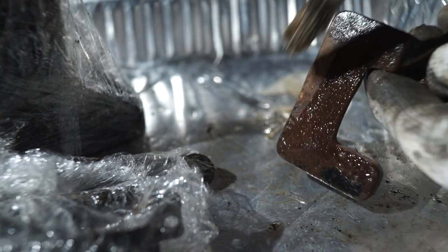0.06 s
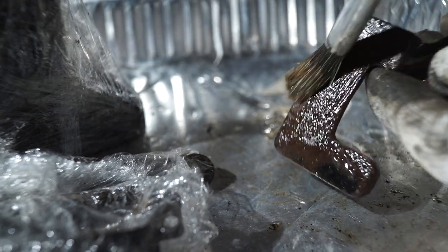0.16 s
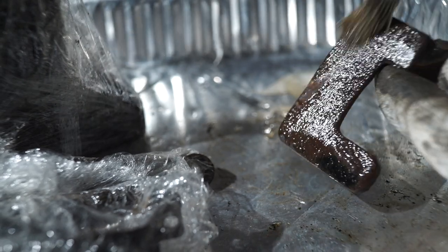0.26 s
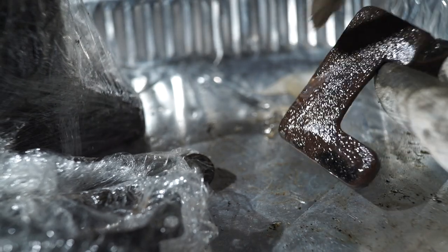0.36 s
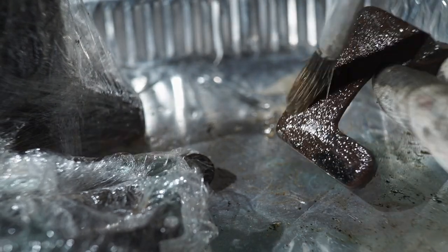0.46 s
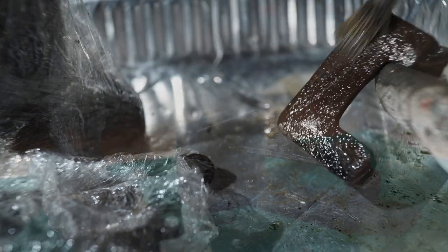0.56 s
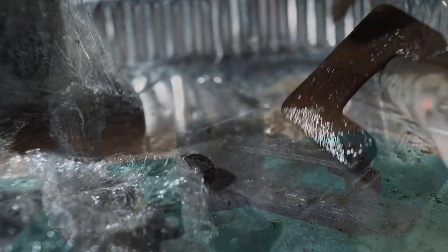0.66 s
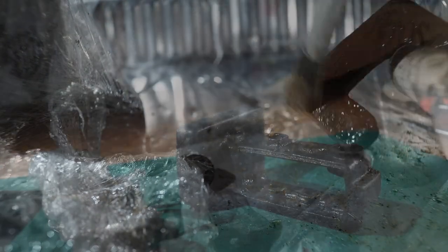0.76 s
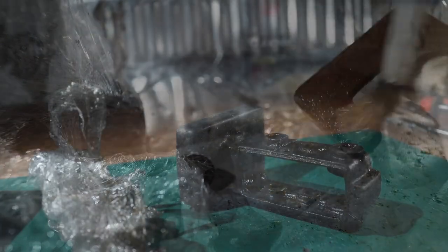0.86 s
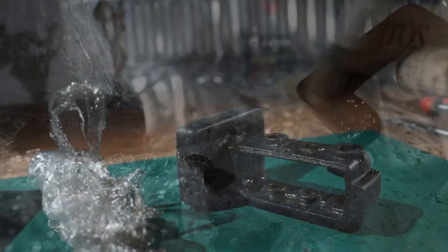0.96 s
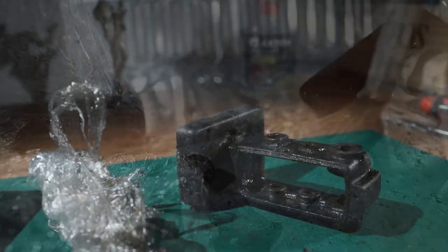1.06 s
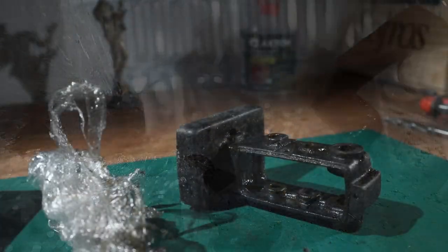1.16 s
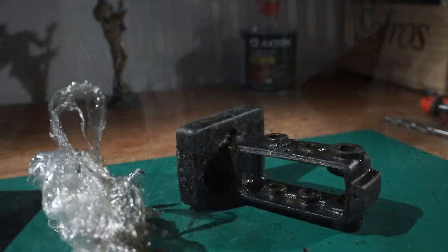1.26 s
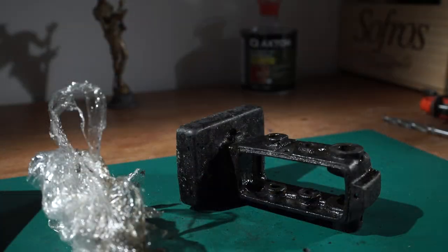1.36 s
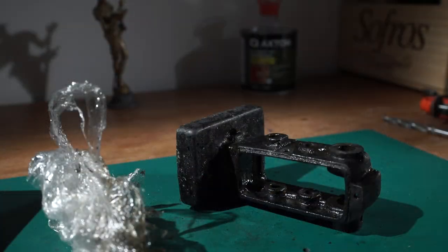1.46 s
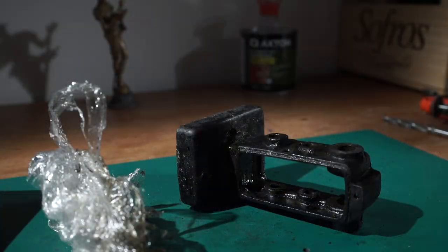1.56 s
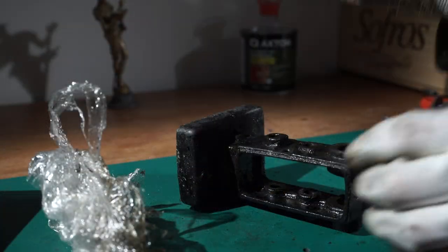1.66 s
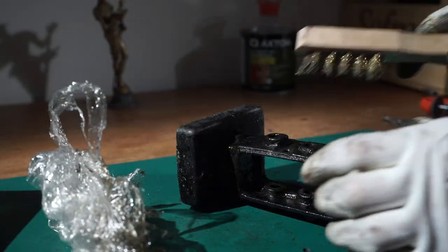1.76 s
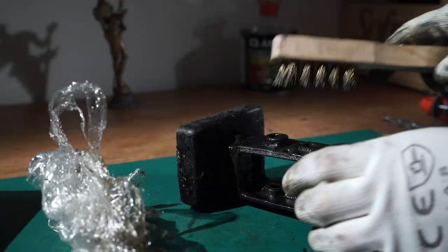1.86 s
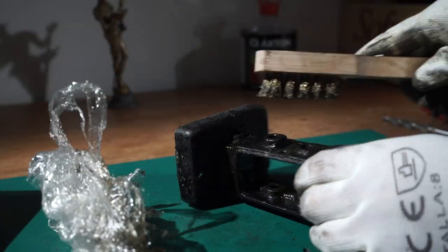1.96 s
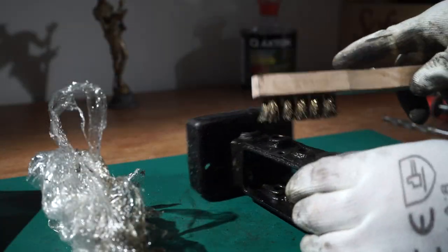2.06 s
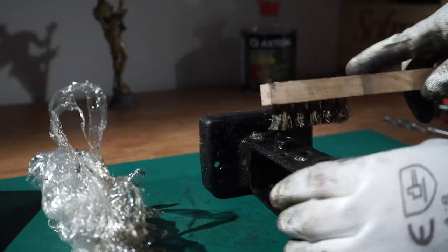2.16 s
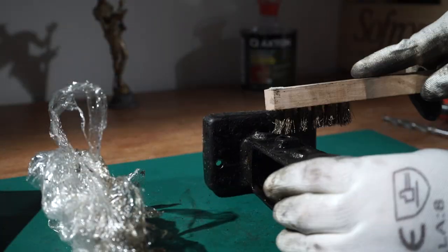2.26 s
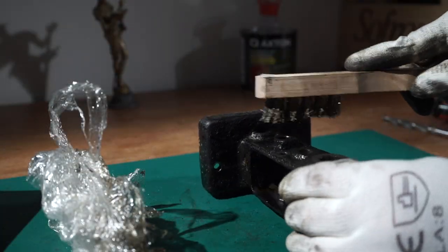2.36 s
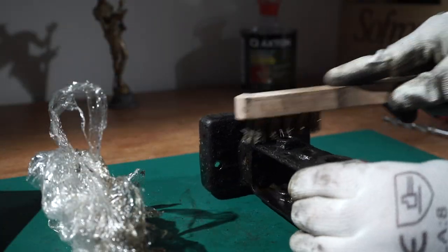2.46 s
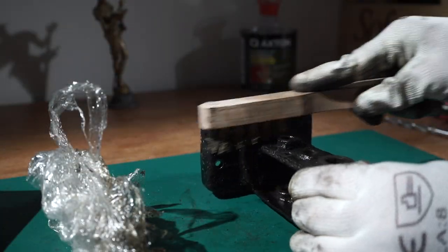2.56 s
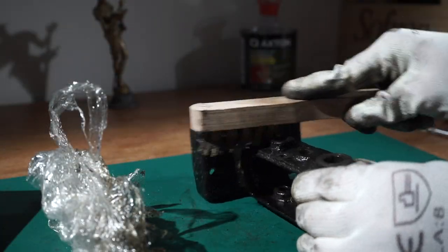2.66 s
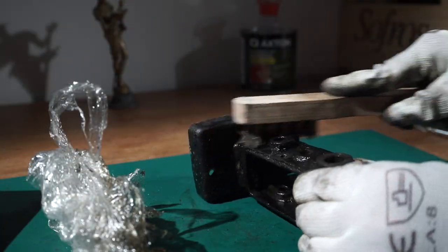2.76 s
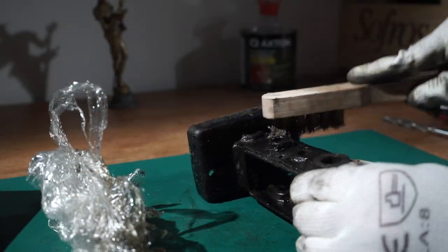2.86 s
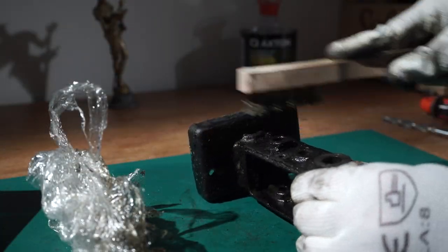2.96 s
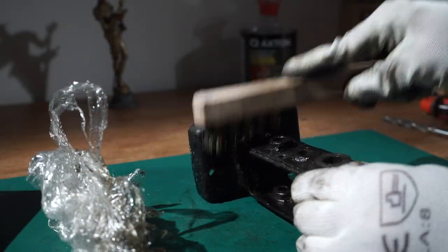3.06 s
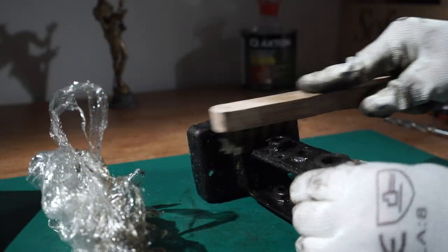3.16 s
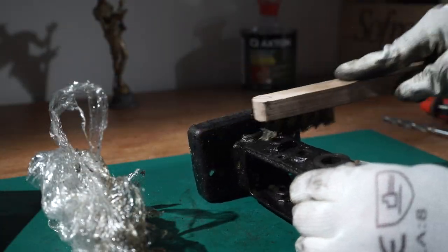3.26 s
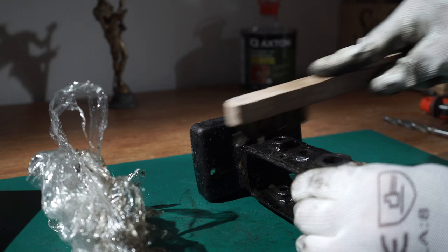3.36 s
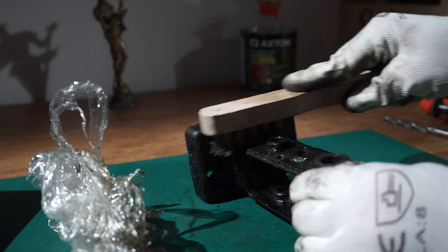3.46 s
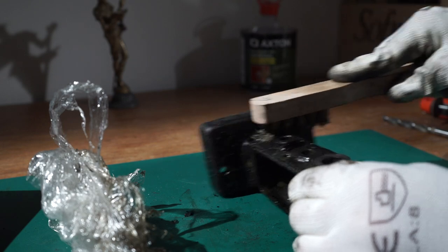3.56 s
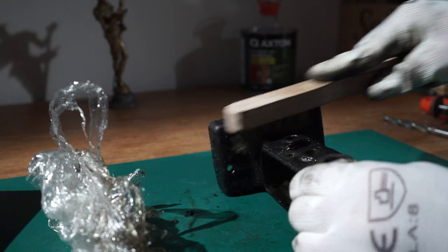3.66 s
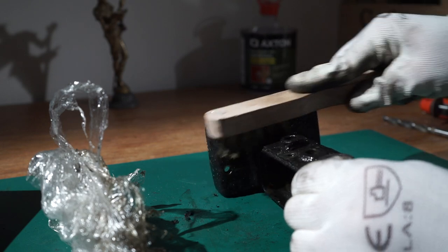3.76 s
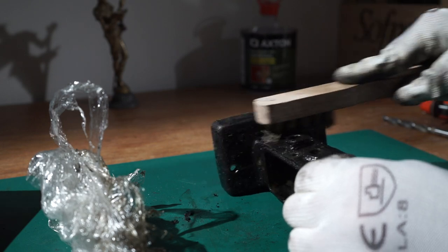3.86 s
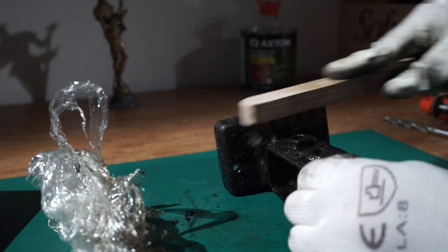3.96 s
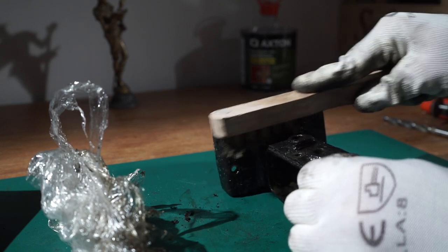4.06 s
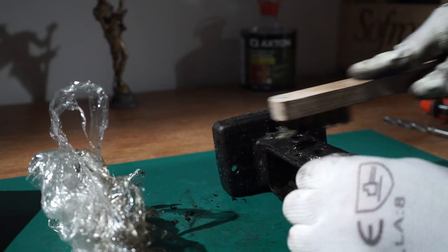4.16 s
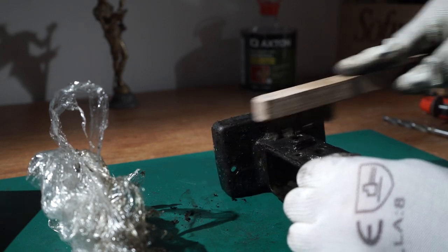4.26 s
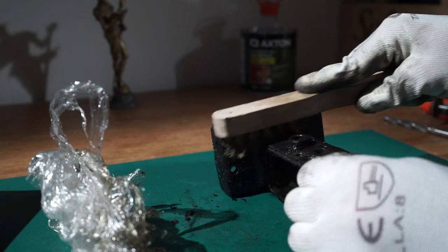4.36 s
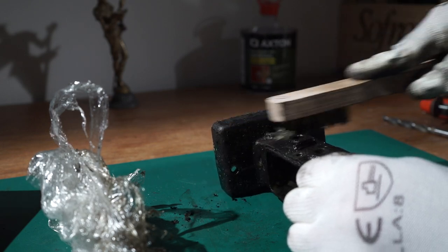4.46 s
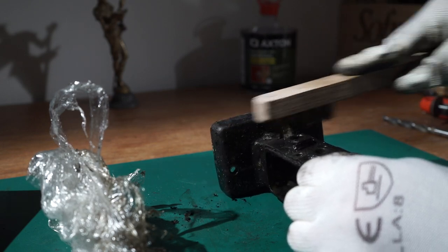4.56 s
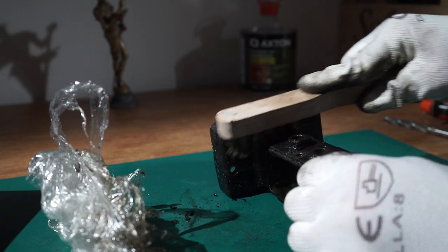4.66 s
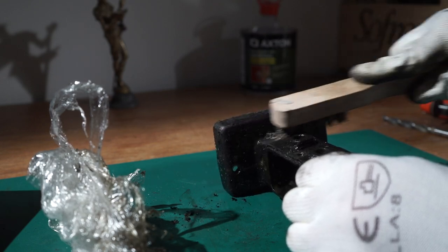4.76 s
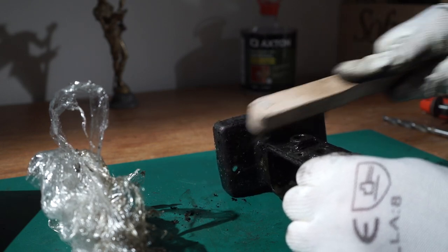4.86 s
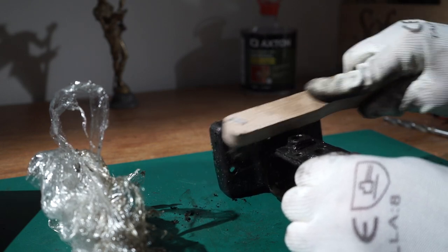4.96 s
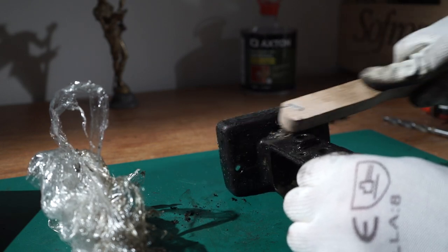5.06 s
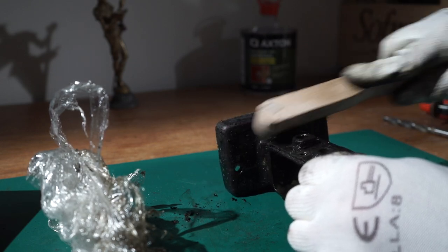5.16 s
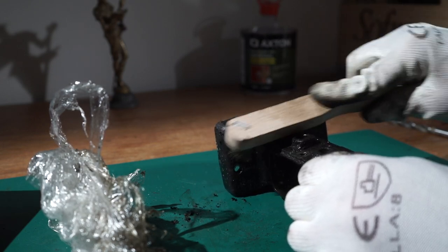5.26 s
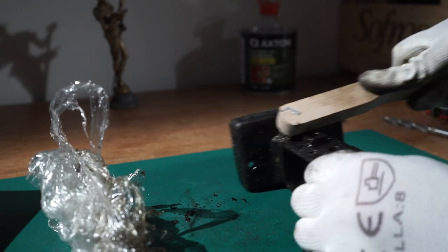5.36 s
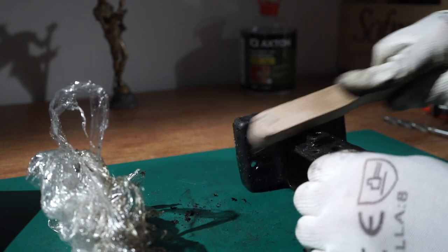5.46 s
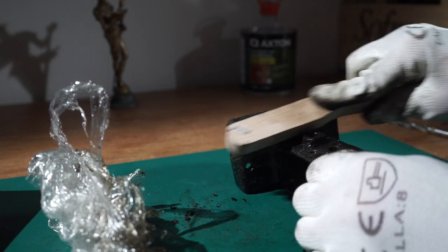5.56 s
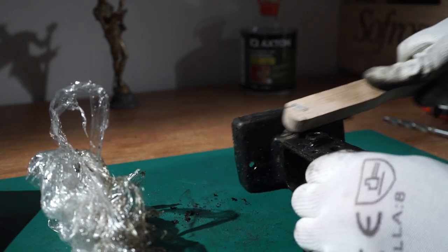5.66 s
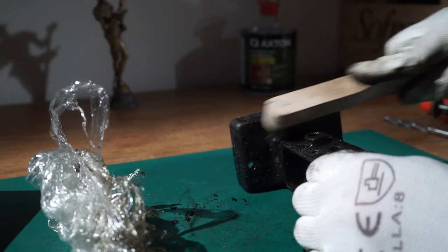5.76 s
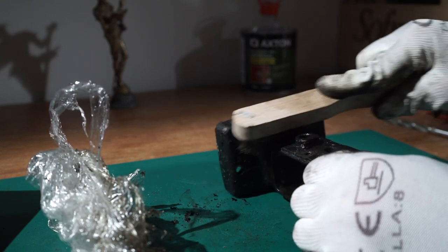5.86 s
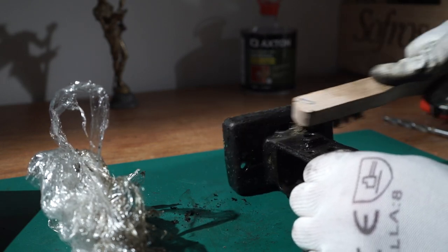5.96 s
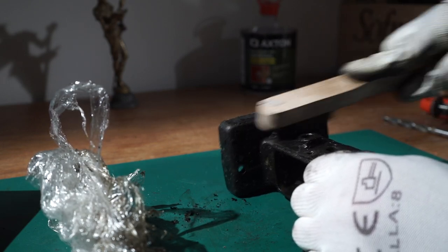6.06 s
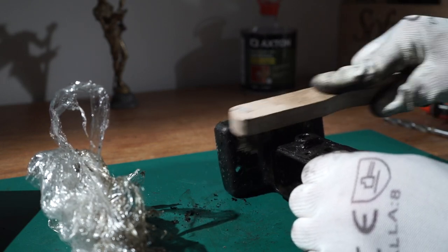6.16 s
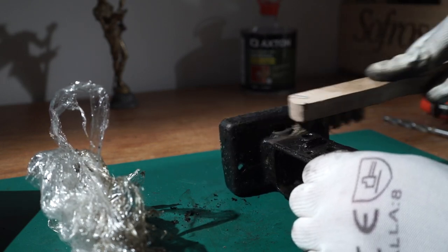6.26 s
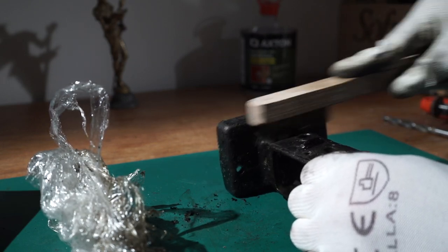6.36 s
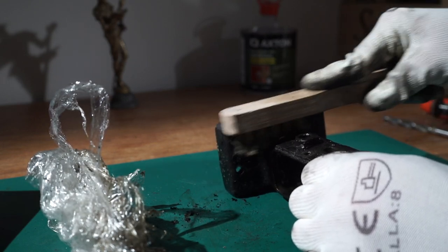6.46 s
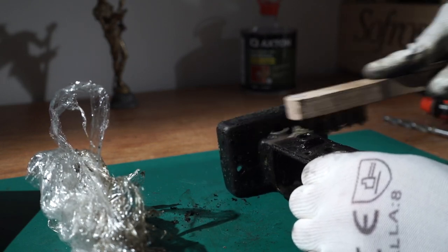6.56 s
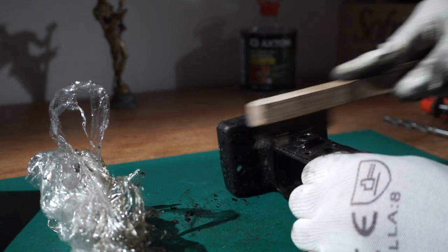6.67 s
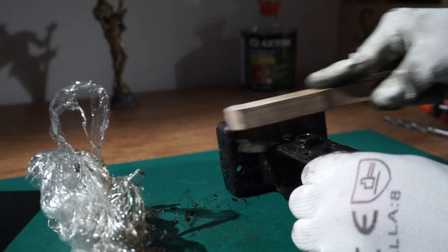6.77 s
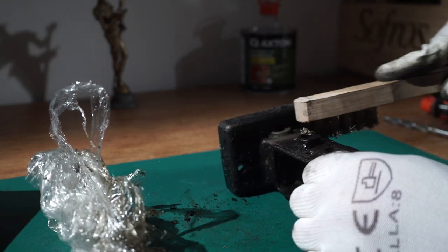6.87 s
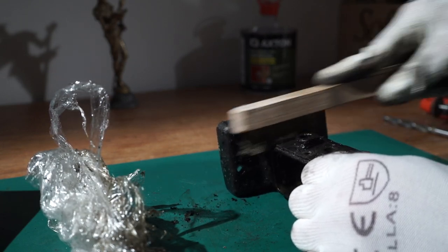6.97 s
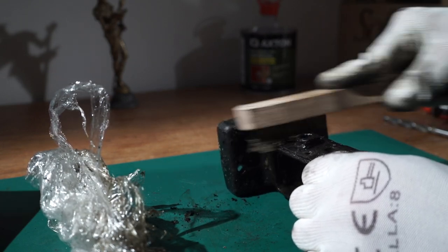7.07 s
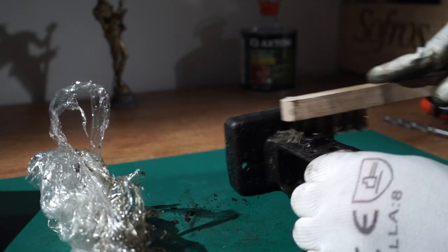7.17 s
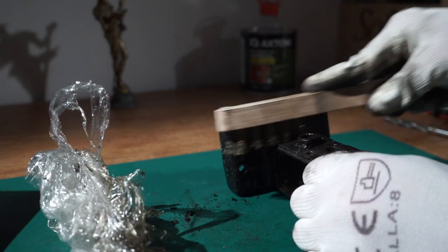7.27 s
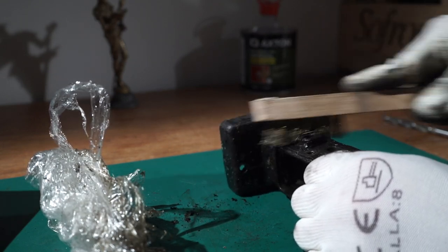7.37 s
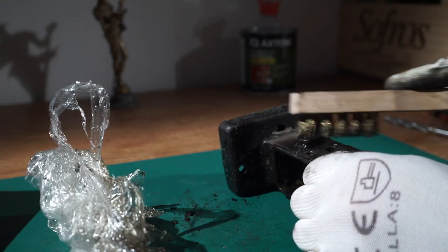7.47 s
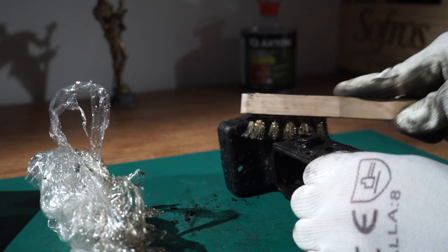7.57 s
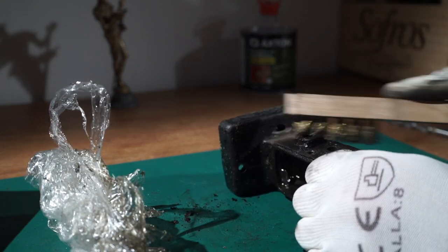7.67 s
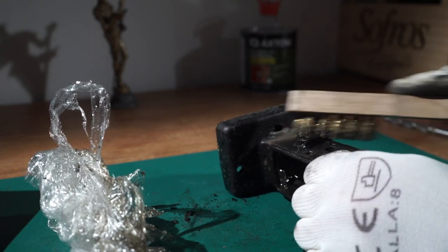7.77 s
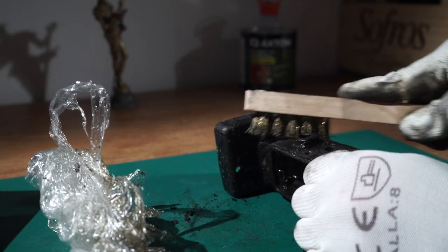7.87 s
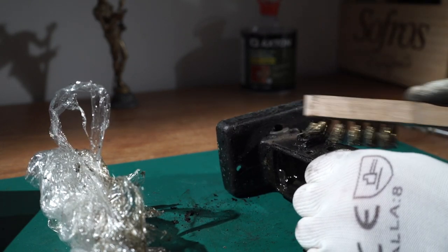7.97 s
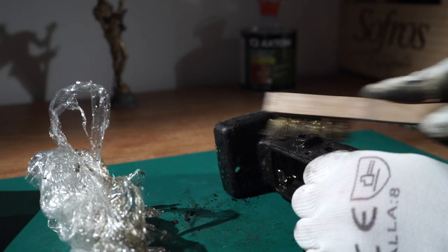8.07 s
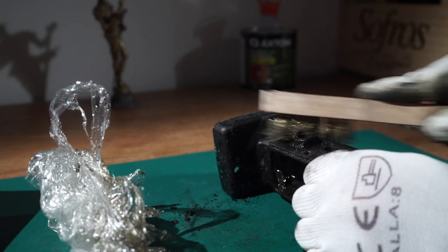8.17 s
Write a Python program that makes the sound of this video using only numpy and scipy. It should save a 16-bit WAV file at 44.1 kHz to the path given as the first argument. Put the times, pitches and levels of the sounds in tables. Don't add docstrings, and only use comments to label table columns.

```python
import sys
import numpy as np
from scipy import signal
from scipy.fft import rfft, irfft, next_fast_len
from scipy.io import wavfile
from scipy.ndimage import uniform_filter1d

SR = 44100
rng = np.random.default_rng(int(sys.argv[2]) if len(sys.argv) > 2 else 0)


def generate_wav(sig):
    pcm = np.round(np.clip(np.atleast_2d(sig).T, -1, 1) * 32767).astype(np.int16)
    wavfile.write(sys.argv[1], SR, pcm)


def volts_from_decibels(level):
    exponent = np.asarray(level, float) / 20
    return 10 ** exponent


N = 362502
TIME_S = np.arange(N) / SR

SPOT_CHANGES_S = 3.38, 7.35


def spot_at(s):
    return np.searchsorted(SPOT_CHANGES_S, s)


# [start_s, length_s, hiss_db, tuft_hump_rel_db, table_shake_db]
TRIALS = [
    (2.49, 0.31, -64.5, -8, -37),
    (2.724, 0.2, -48.5, 8.5, -32.5),
    (3.135, 0.01, -49, 10, -60),
    (3.19, 0.15, -48.5, 9, -33.5),
]
PUSHES = [(3.392, 0.1, -47.5, 14.5, -30), (3.684, 0.11, -45, 13.5, -24), (4.005, 0.099, -45, 11.5, -25),
          (4.306, 0.097, -42.5, 14.5, -24.5), (4.608, 0.087, -42, 18.5, -19),
          (4.899, 0.098, -42.5, 15.5, -21.5), (5.205, 0.092, -41.5, 15, -25),
          (5.487, 0.1, -42, 13.5, -21.5), (5.802, 0.09, -42.5, 14, -24.5), (6.094, 0.1, -41.5, 16, -27),
          (6.388, 0.099, -42.5, 15, -26), (6.691, 0.095, -43, 10.5, -23.5), (6.973, 0.095, -41, 9.5, -17),
          (7.258, 0.084, -43, 6.5, -17.5), (7.541, 0.09, -46, 6, -26.5), (7.823, 0.089, -46, 4, -26),
          (8.081, 0.085, -43.5, 2, -24.5)]
PULLS = [(3.529, 0.11, -49, 12, -21.5), (3.817, 0.14, -48.5, 11.7, -26.5), (4.125, 0.13, -45.5, 12.4, -27),
         (4.443, 0.11, -45, 9.5, -28), (4.733, 0.13, -45.5, 9.6, -24.5), (5.026, 0.13, -45, 14.5, -23.5),
         (5.322, 0.12, -45, 16.3, -26), (5.624, 0.13, -44, 15.8, -26.5), (5.923, 0.13, -44.5, 11.6, -28.5),
         (6.229, 0.12, -46, 13.4, -27), (6.518, 0.12, -46.5, 10.2, -28.5), (6.817, 0.11, -44.5, 9.4, -27.5),
         (7.096, 0.11, -45, 9.6, -29), (7.375, 0.12, -44, 4.2, -26.5), (7.664, 0.13, -44.5, 4, -29.5),
         (7.95, 0.098, -45.5, 3.6, -30.5), (8.19, 0.42, -46, 15, -26)]
# [push_db, pull_db]
RING_DB = [(0, -12), (-7.5, -5.5), (1, 3)]
TRIAL_RING_DB = [3.5, 2, -3.5, -1]
# start_s, length_s, shake_db
DRAG = (2.034, 0.18, -38.5)


def stroke_pressure():
    kind = np.repeat([0, 1, 2], [len(TRIALS), len(PUSHES), len(PULLS)])
    rows = np.array(TRIALS + PUSHES + PULLS)
    order = np.argsort(rows[:, 0])
    kind = kind[order]
    s, length, db, tuft_db, shake_db = rows[order].T
    peak = np.array([0.3, 0.51, 0.41])[kind]
    frame_db = np.array(RING_DB)[spot_at(s), kind // 2]
    frame_db += 4.5 * (s - 7.8) * (s > SPOT_CHANGES_S[1])
    frame_db[kind == 0] = TRIAL_RING_DB
    pressure = swells(s, length, db, peak, ends_db=9.5)
    pressure += volts_from_decibels(-50) * uniform_filter1d(pressure, 6000)
    force = swells(s, length, shake_db, peak, ends_db=4.5) + swells(*DRAG, 0.38, ends_db=4.5)
    force += volts_from_decibels(-24.5) * uniform_filter1d(force, 6000)
    tuft, frame = (volts_from_decibels(np.interp(TIME_S, s + length / 2, db)) for db in (tuft_db, frame_db))
    return pressure, force, tuft, frame


# [freq_hz, level_db_per_hz]
WIRE_HISS = [(300, -11), (1000, 7.5), (2500, 6.5), (5000, 0.5), (6300, -1), (7800, -2.5), (9000, 3),
             (10200, -3.5), (11800, -1.5), (14000, -7), (15800, -5.5)]
# [freq_hz, width_hz, level_db]
TUFT_MODES = [(2270, 670, -11), (3700, 800, 4.5), (4180, 1220, -3.5)]
# [freq_hz, width_hz, level_db]
FRAME_EDGE = [(1300, 15, -8), (1860, 230, -8), (3220, 60, -12), (3680, 42, -7), (4610, 28, -17),
              (5190, 47, -12), (5390, 42, -5.5), (6200, 33, -23), (7140, 53, -19), (9000, 120, -22),
              (10800, 44, -29), (11500, 110, -27)]
FRAME_TOP = [(1290, 40, -12), (2245, 14, -2), (3537, 60, -1), (3680, 48, 1), (5140, 46, -9), (5830, 26, -8),
             (6770, 46, -15), (7040, 70, -14), (7184, 34, -12), (9400, 36, -11), (11780, 60, -16),
             (12360, 61, -14), (13010, 48, -16)]
FRAME_SIDE = [(1280, 79, -18), (1923, 37, -5.5), (2260, 22, -11.5), (2590, 47, -11.5), (3160, 110, -7),
              (3680, 40, -.5), (4620, 40, -15), (5140, 55, -4), (5375, 65, -6), (7080, 110, -10.5),
              (8570, 51, -30), (9500, 57, -21), (11040, 62, -19), (11800, 60, -15)]
# [time_s, level_db]
SIDE_IN = [(6.3, -40), (6.55, -8), (7.2, -6), (7.4, 0), (8.22, 0)]


def wire_brush(pressure, tuft, frame, snaps):
    slips = flicks(per_s=9000, spread_db=-0.56)
    slips = slips * flutter(rate_hz=36.0, depth_db=1.0) * flutter(rate_hz=270, depth_db=-0.36)
    hiss = mottled(colour(slips, WIRE_HISS), depth_db=1.8)
    hiss /= np.std(band(hiss, 6000, 15000))
    tufts = evened(mottled(ring(slips, TUFT_MODES), depth_db=2.0)) * tuft * volts_from_decibels(-3.5)
    drive = volts_from_decibels(28.0) * slips * pressure * frame
    spot = spot_at(TIME_S)
    drive += volts_from_decibels(8) * snaps * (spot == 0) * (TIME_S > 2.4)
    edge = ring_unevenly(drive * (spot == 0), FRAME_EDGE)
    top = ring_unevenly(drive * (spot == 1), FRAME_TOP)
    side = ring_unevenly(drive * follow(SIDE_IN) * (spot > 0), FRAME_SIDE)
    return (hiss + tufts) * pressure + mottled(edge + top + side, depth_db=1.7)


# [start_s, peak_db]
SNAGS = [(3.4186, -21), (3.5633, -20), (3.5937, -20), (3.703, -27), (3.7369, -20), (3.8462, -31),
         (3.8656, -22), (3.8926, -18), (4.0352, -22), (4.1455, -20), (4.2936, -32), (4.4772, -23),
         (4.597, -33), (4.8953, -18), (4.9077, -15), (4.9177, -15), (4.9487, -12), (5.0499, -24),
         (5.2135, -18.5), (5.2334, -23), (5.2424, -39), (5.2619, -19), (5.2884, -29), (5.3502, -19),
         (5.3654, -14), (5.3814, -22), (5.5009, -18), (5.6261, -32), (5.6516, -14), (5.7977, -30),
         (5.8237, -13), (5.9524, -27), (5.9673, -19), (6.1055, -18), (6.131, -14), (6.2577, -30),
         (6.4183, -11.5), (6.54, -26), (6.7256, -23), (6.8448, -29), (6.9614, -37), (6.9795, -19),
         (7.5438, -24), (7.6999, -30), (7.8476, -21), (8.0945, -24)]


def snags():
    return volts_from_decibels(-7) * bursts(SNAGS, 0.012, TUFT_MODES)


# [start_s, peak_db]
PLUCKS = [(2.4998, -57), (2.5138, -51), (2.5437, -38), (2.585, -42), (2.6126, -39), (2.6594, -41),
          (2.6889, -53), (2.7073, -54), (2.7208, -51), (2.7388, -41), (2.7887, -41), (2.876, -30),
          (2.9243, -38)]
# [freq_hz, width_hz, level_db]
TINES = [(3900, 120, 1.5), (6970, 120, -1), (8450, 200, -4), (11900, 280, -7)]


def plucks():
    return volts_from_decibels(0.5) * bursts(PLUCKS, 0.0052, TINES)


# [start_s, length_s, level_db]
LANDINGS = [
    (2.532, 0.11, -58),
    (3.115, 0.034, -59),
]


def landing():
    pings = sum(ring(flicks(per_s=130, spread_db=1.5), [tine]) for tine in TINES)
    return evened(pings) * swells(*np.transpose(LANDINGS), 0.42, ends_db=10)


# [freq_hz, width_hz, level_db]
TABLE_LOW = [(50.4, 44.5, -5.5), (75.4, 18, 5), (108.4, 13.5, 1), (157, 44, -4), (194.5, 65, -9)]
TABLE_HIGH = [(222, 53, 1.5), (303, 39, 4.5), (331.4, 23, 5.5), (423.6, 86, -0.5), (583, 102, -5),
              (687, 150, -9.5)]
SHAKE_HIGH_DB = [-17, -16, -12.5]


def table_shake(force):
    judder = flicks(per_s=800, spread_db=1.03) * flutter(rate_hz=28, depth_db=2.5)
    s, db, high_db, _ = np.transpose(THUMPS + KNOCKS)
    rebound = swells(s, 0.093, db + high_db / 2 - 20.5, 0.1, ends_db=13.5)
    low = evened(ring(band(judder, 32.0, 520), TABLE_LOW)) * force
    high_force = force * volts_from_decibels(np.array(SHAKE_HIGH_DB)[spot_at(TIME_S)]) + rebound
    high = evened(ring(band(judder, 200, 1150), TABLE_HIGH)) * high_force
    return low + high


# [start_s, peak_db, high_modes_rel_db, clack_rel_db]
THUMPS = [
    (0.719, -25.5, -28, 14),
    (0.852, -35, -16, 5),
    (0.988, -36.5, -7, -31),
    (1.399, -39.5, -28, -11),
    (2.045, -18, -20, -19),
    (2.354, -7.5, -18, -30),
    (2.534, -16.5, -61, -37),
    (3.139, 0, -46, -38),
]
KNOCKS = [(3.443, -2.5, -10.5, -18), (3.575, -8.5, -18, -20), (3.882, -24, -5, -33), (4.038, -17, -15, -25),
          (4.312, -22.5, -12.5, -37), (4.346, -19, -5, -20), (4.611, -6, -9.5, -15), (4.761, -19, -11, -28),
          (4.918, -25, -26, -32), (4.993, -8.5, -17, -29), (5.044, -22, -31, -29), (5.112, -12, -6.5, -14),
          (5.423, -9, -11.5, -16), (5.731, -4, -27.5, -26), (6.132, 0, -15, -21), (6.43, -4.5, -14, -36),
          (6.713, -16, -23, -27), (6.96, -12, -9.5, -19), (7.03, -14.5, -18, -2.5), (7.247, 0, -14, -20),
          (7.306, -14, 0, -4), (7.547, -21, -41, -14), (7.807, -4, -10.5, -20.5), (7.865, -10, -9.5, -21.5),
          (8.077, -6, -10.5, -39), (8.125, -7, -5, -32)]
# [start_s, peak_db, high_modes_rel_db]
BUMPS = [(2.79, -30, -28), (2.883, -23, -24), (3.311, -22, -21.5), (3.699, -20, -24), (4.068, -14, -14),
         (4.378, -30, -14), (4.487, -37, -4), (4.669, -15, -21), (4.948, -19, -16), (5.269, -9.5, -29),
         (5.565, -13.5, -14), (5.916, -16, -27), (6.263, -22, -27), (6.398, -20, -25), (6.613, -17, -17),
         (6.733, -19.5, -10), (7.4, -33, -12), (7.696, -15, -18), (7.964, -30, -13)]
# [freq_hz, width_hz, level_db]
THUMP_TABLE = [(51.4, 28, -7), (76.7, 26, 0), (109.6, 7.1, 9), (154, 31, -12), (258, 12, -8.5)]


def knocks():
    out, t = np.zeros(N + SR), np.arange(SR // 3) / SR
    rows = [(*r, 0.19, 0.83) for r in THUMPS]
    rows += [(*r, 0.23, 0.994) for r in KNOCKS]
    rows += [(*r, -60, 0.16, 0.87) for r in BUMPS]
    chance = rng.standard_normal((len(rows), 2, len(t)))
    for (s, db, high_db, clack_db, t60, hard), (tune, grit) in zip(rows, chance):
        modes = THUMP_TABLE if s < SPOT_CHANGES_S[0] else TABLE_LOW
        decay = volts_from_decibels(-60 * t / max(t60, .02))
        glide_hz = hard * (88 + 100 * np.exp(-t / 0.005))
        swing = -np.sin(2 * np.pi * np.cumsum(glide_hz) / SR)
        swing *= (t / .006) ** 1.5 * np.exp(-t / 0.0039)
        after = np.zeros(len(t))
        for k, (hz, _, mode_db) in enumerate(modes):
            cycles = hz * (1 + 0.05 * tune[k]) * t
            after += volts_from_decibels(mode_db) * np.sin(2 * np.pi * (cycles + tune[-k]))
        after *= decay * (1 - np.exp(-(t / 0.03) ** 2))
        rattle = ring(tune * decay * (t > .008), modes)
        pulse = volts_from_decibels(22) * np.exp(-((t - .004) / 0.00033) ** 2)
        high = ring(grit * volts_from_decibels(-60 * t / 0.1) + pulse, TABLE_HIGH)
        clack = band(grit * (t > .002), 390, 1870) * volts_from_decibels(-60 * t / 0.019)
        parts = [(swing, 0), (after, -12), (rattle, -12), (high, high_db + 3.5), (clack, clack_db)]
        out[round(s * SR):][:len(t)] += sum(volts_from_decibels(db + rel_db) * p / abs(p).max() for p, rel_db in parts)
    return band(out[:N], 38, 12000)


# [freq_hz, width_hz, level_db]
BOARD = [(284, 16, -7), (260, 22, -13)]
BOARD_DB = [-18.5, -16.5, -8]
# [start_s, length_s, level_db]
GROANS = [
    (4.04, .07, -51),
    (4.307, 0.08, -36),
    (4.368, 0.064, -32.5),
    (5.323, 0.16, -46.5),
    (5.5, 0.15, -46),
    (5.813, 0.16, -38.5),
    (7.302, 0.053, -34),
]
# [freq_hz, width_hz, level_db]
SKID_MODES = [(344, 19, 1), (427, 120, -13.5), (530, 21, 1.5), (624, 19, -2.5), (680, 53, -6.5)]


def skids(force):
    judder = flicks(per_s=1500, spread_db=0.0) * flutter(rate_hz=54, depth_db=2.0)
    hum = evened(ring(judder, BOARD)) * force * volts_from_decibels(np.array(BOARD_DB)[spot_at(TIME_S)])
    groan = evened(ring(band(judder, 280, 930), SKID_MODES))
    return hum + groan * swells(*np.transpose(GROANS), 0.27, ends_db=25.0)


# [freq_hz, level_db_per_hz]
TAP_CRACK = [(200, -22), (1070, -9), (1800, -4), (2330, -2), (2950, -7), (3650, 4), (4250, -10),
             (15000, -62)]
# [freq_hz, level_db, t60_s]
TRAY = [(412, -5.5, 0.1), (740, 2, 0.071), (1075, 2, 0.07), (1460, -25, 0.07), (1900, -30, 0.12),
        (2000, -27, 0.05), (2370, -34, 0.08), (2830, -27, 0.2), (2980, -32, 0.084), (3240, -36, 5.0),
        (3430, -34, 0.14), (3671, -35, 0.3)]


def tap():
    out, t = np.zeros(N), np.arange(SR // 2) / SR
    grit = evened(colour(rng.standard_normal(len(t)), TAP_CRACK))
    crack = grit * (1 - np.exp(-t / 0.0008)) * volts_from_decibels(-60 * t / 0.045)
    crack += evened(band(rng.standard_normal(len(t)), 900, 3800)) * volts_from_decibels(-32 - 60 * t / .55)
    crack += evened(ring(rng.standard_normal(len(t)), [(3700, 130, 0)])) * volts_from_decibels(-42.5 - 60 * t / 0.87)
    out[round(.7215 * SR):][:len(t)] = volts_from_decibels(-11.5) * (0.8 * crack + 0.2 * dying(TRAY, t))
    return out


# [freq_hz, level_db, t60_s]
PING = [(2260, -3, 0.41), (3220, 2, 0.26), (3488, -21, 0.67), (3800, -18, 0.82), (4613, -18, 0.16),
        (5163, -13, 0.23)]


def ping():
    out, t = np.zeros(N), np.arange(SR // 2) / SR
    out[round(2.355 * SR):][:len(t)] = volts_from_decibels(-55.5) * dying(PING, t)
    return out


# [start_s, peak_db, centre_hz, t60_s]
TICKS = [(0.851, -47, 3540, 0.028), (0.86, -35, 3240, 0.032), (1.05, -41.5, 2480, 0.046),
         (1.0643, -37, 3200, 0.076), (1.134, -41.5, 3280, 0.052), (1.22, -30.5, 4400, 0.013),
         (1.2522, -31, 3300, 0.018), (1.419, -37.5, 2230, 0.072), (1.56, -37, 1530, 0.061),
         (1.7387, -28.5, 3390, 0.007), (1.8546, -37, 2560, 0.01), (2.0466, -26.5, 4070, 0.007),
         (2.3537, -27.5, 1510, 0.017), (2.4409, -45, 3140, 0.028), (2.5002, -50, 3680, 0.03),
         (2.546, -34.5, 3170, 0.054), (2.586, -48, 3490, 0.013), (2.6453, -35, 4000, 0.013),
         (2.664, -44, 4180, 0.03), (2.6893, -42, 3680, 0.022), (2.9244, -36, 3680, 0.016),
         (3.106, -41.5, 3770, 0.054), (3.123, -37, 3240, 0.016), (3.139, -33, 3220, 0.013),
         (3.3962, -32, 3670, 0.026), (2.516, -51, 2500, .02), (2.564, -46, 3900, 0.018),
         (7.81, -24, 1500, .04), (7.866, -22.5, 1280, 0.033), (8.127, -13, 1300, 0.021),
         (7.029, -18, 2280, 0.023), (7.245, -24, 1900, 0.03), (7.306, -20.5, 2260, 0.022),
         (8.077, -30, 1440, 0.024), (1.017, -56, 8500, .006), (1.083, -43, 5000, 0.012),
         (1.453, -46, 8000, 0.0053), (1.588, -41, 3300, .008), (1.811, -34, 2110, 0.0066),
         (2.05, -38, 3000, 0.056), (4.145, -49, 2500, .012), (5.351, -36, 2400, .012),
         (1.6, -44, 2500, .015), (1.39, -56, 1900, .015)]


def ticks():
    out, t = np.zeros(N + SR), np.arange(SR // 10) / SR
    for (s, db, hz, t60), grit in zip(TICKS, rng.standard_normal((len(TICKS), len(t)))):
        snap = band(grit * volts_from_decibels(-60 * t / max(t60, .005)), 0.51 * hz, 1.16 * hz)
        out[round(s * SR):][:len(t)] += volts_from_decibels(db) * snap / abs(snap).max()
    return out[:N]


# [start_s, length_s, level_db, dull_rub_rel_db]
DAB_ROWS = [
    (-.1, 0.21, -51, 8.5),
    (0.095, 0.23, -60, 14),
    (0.219, 0.097, -50, 0),
    (0.417, 0.086, -72, 0),
    (0.521, 0.13, -51, 3.5),
    (0.671, 0.048, -60.5, 19),
]
CRINKLES = [(.74, 0.22, -60, 14.5), (1.04, 0.19, -59, 7), (1.2, 0.11, -54.5, -8), (1.36, 0.2, -54.5, 4),
            (1.46, 0.086, -45.5, 4), (1.55, 0.066, -46.5, -9), (1.66, 0.22, -51, -4),
            (1.74, 0.081, -53.5, -8), (1.89, 0.2, -49.5, 2), (2.04, 0.16, -50.5, 13.5),
            (2.2, 0.18, -52, 8.5), (2.43, 0.048, -59, 14), (2.509, 0.062, -57, -13)]
# [freq_hz, level_db_per_hz]
CLOTH = [(590, -47), (1000, -16), (1250, -9), (1470, 1), (2090, 3), (3270, -3), (3760, 2), (4310, -2.5),
         (9000, -19.5), (11700, -65), (19800, -120)]
DABS = [(590, -48), (1000, -25), (1530, -2), (2050, -2.5), (2370, -5), (3790, 0.5), (5480, -15),
        (9000, -20), (11700, -49), (19800, -120)]


def rustle():
    s, length, db, rub_db = np.transpose(DAB_ROWS + CRINKLES)
    level, rubbing = (swells(s, length, d, 0.35, ends_db=10.5) for d in (db, db + rub_db - 9.0))
    crackle = evened(colour(flicks(per_s=7000, spread_db=2.2), CLOTH)) * flutter(rate_hz=58, depth_db=0.5)
    dabs = evened(colour(rng.standard_normal(N), DABS))
    dabbing = TIME_S < .7
    fine = evened(band(rng.standard_normal(N), 3600, 16000)) * volts_from_decibels(np.where(dabbing, -8.5, -20))
    fine *= np.clip(TIME_S / 0.34, .3, 1)
    rub = evened(band(rng.standard_normal(N), 224, 1100))
    return level * (np.where(dabbing, dabs, crackle) + fine) + rubbing * rub


# [start_s, length_s, level_db]
SCUFFS = [
    (1.49, 0.04, -43),
    (1.77, 0.059, -45),
    (1.918, 0.049, -53),
    (2.726, 0.06, -45.5),
]
# [freq_hz, width_hz, level_db]
SCUFF_MODES = [(1640, 310, -3), (2130, 540, 0.5), (2900, 520, -3)]


def scuffs():
    grains = evened(ring(flicks(per_s=2100, spread_db=0.5), SCUFF_MODES))
    return grains * swells(*np.transpose(SCUFFS), 0.47, ends_db=11)


def room(x, t60=.22):
    t = np.arange(SR // 2) / SR
    echoes = rng.choice([-1., 1.], len(t)) * (rng.random(len(t)) < .05)
    echoes = band(echoes * volts_from_decibels(-60 * t / t60) * (t > .004), 330, 4700)
    return signal.fftconvolve(x, echoes / np.linalg.norm(echoes))[:N]


# [freq_hz, level_db_per_hz]
AIR = [(12, -46), (25, 12.5), (45, 3), (85, 3.5), (145, -8), (345, -11), (539, -11.5), (969, -18.5),
       (2120, -23.5), (3700, -22), (5320, -30.5), (15800, -36)]
# [time_s, level_db]
LUMPS_IN = [(0, 1), (.9, 1), (1.3, -5.5), (8.22, 13.5)]
HUM_IN = [(0, -9.5), (.9, -10), (1.2, -6), (8.22, 12)]
# [freq_hz, level_db]
HUM = [(100, -41.5), (150, -56), (200, -57.5)]


def room_air():
    floor = volts_from_decibels(-53 + 0.5) * evened(colour(rng.standard_normal(N), AIR))
    lumps = band(floor, 15, 160)
    floor += lumps * (flutter(rate_hz=1.4, depth_db=0) * follow(LUMPS_IN) - 1)
    hum = sum(volts_from_decibels(db - 3.0) * np.sin(2 * np.pi * hz * TIME_S) for hz, db in HUM)
    return floor + hum * follow(HUM_IN)


def evened(x):
    return x / np.sqrt(np.mean(x ** 2) + 1e-20)


def follow(points):
    return volts_from_decibels(np.interp(TIME_S, *np.transpose(points)))


def colour(x, points):
    f, db = np.transpose(points)
    size = next_fast_len(len(x))
    hz = np.fft.rfftfreq(size, 1 / SR)
    gain = volts_from_decibels(np.interp(np.log(hz + 1), np.log(f + 1), db))
    return irfft(rfft(x, size) * gain, size)[:len(x)]


def band(x, lo_hz, hi_hz):
    return signal.sosfilt(signal.butter(2, [lo_hz, hi_hz], "bandpass", fs=SR, output="sos"), x)


def ring(x, modes):
    out = np.zeros(len(x))
    for k, (hz, width, db) in enumerate(modes):
        out += (-1) ** k * volts_from_decibels(db) * signal.lfilter(*signal.iirpeak(hz, hz / width, SR), x)
    return out


def ring_unevenly(x, modes):
    knots = np.arange(0, N / SR + 1, .07)
    gains = volts_from_decibels(2.2 * rng.standard_normal((len(modes), len(knots))))
    out = np.zeros(N)
    for k, (mode, gain) in enumerate(zip(modes, gains)):
        out += (-1) ** k * ring(x * np.interp(TIME_S, knots, gain), [mode])
    return out


def dying(modes, t):
    return sum(volts_from_decibels(db - 60 * t / np.clip(t60, .01, .4)) * np.sin(2 * np.pi * hz * t) for hz, db, t60 in modes)


def flicks(per_s, spread_db):
    size = volts_from_decibels(spread_db * np.minimum(rng.exponential(1, N), 5))
    return evened(size * rng.standard_normal(N) * (rng.random(N) < per_s / SR))


def flutter(rate_hz, depth_db):
    return volts_from_decibels(depth_db * evened(band(rng.standard_normal(N), rate_hz / 8, rate_hz)))


def mottled(x, depth_db):
    z = signal.stft(x, nperseg=512)[2]
    patches = uniform_filter1d(rng.standard_normal(z.shape), size=5, axis=0)
    patches = uniform_filter1d(patches, size=12, axis=1)
    return signal.istft(z * volts_from_decibels(depth_db * evened(patches)), nperseg=512)[1][:N]


def swells(starts, lengths, levels_db, peak, ends_db):
    t, power = np.arange(0, N, 32) / SR, 0
    for s, length, db, lean in np.broadcast(starts, lengths, levels_db, np.clip(peak, .2, .8)):
        u = (t - s) / length - lean
        rise = (-u.clip(max=0) / lean) ** 1.84
        fall = (u.clip(0) / (1 - lean)) ** 2.57
        power = power + volts_from_decibels(2 * (db - np.minimum(ends_db * np.where(u < 0, rise, fall), 200)))
    return np.interp(TIME_S, t, np.sqrt(power))


def bursts(rows, t60, modes):
    t, out = np.arange(2000) / SR, np.zeros(N + 2000)
    for (s, db), grit in zip(rows, rng.standard_normal((len(rows), len(t)))):
        shower = ring(grit * np.minimum(t / 0.0007, 1) * volts_from_decibels(-60 * t / max(t60, .003)), modes)
        out[round(s * SR):][:len(t)] += volts_from_decibels(db) * shower / abs(shower).max()
    return out[:N]


def scene():
    pressure, force, tuft, frame = stroke_pressure()
    snaps = ticks()
    near = wire_brush(pressure, tuft, frame, snaps) + snags() + plucks()
    near += tap() + ping() + snaps + rustle() + scuffs()
    table = table_shake(force) + knocks() + skids(force)
    return (near + volts_from_decibels(-19.5) * room(near) + table + room_air() + landing())[None]


def band_limit(x):
    return signal.sosfilt(signal.butter(12, 16690, fs=SR, output="sos"), x)


# freq_hz, width_hz, level_db beside the direct sound
PORT = (3280, 870, -5.5)


def record(dry):
    heard = dry[0] + ring(dry[0], [PORT])
    low_pass = signal.firwin(511, 15800, window=("kaiser", 9), fs=SR)
    heard = signal.oaconvolve(heard.clip(-1, 1), low_pass, "same")
    return band_limit(heard[None])


dry = scene()
out = record(dry)
generate_wav(out)
```